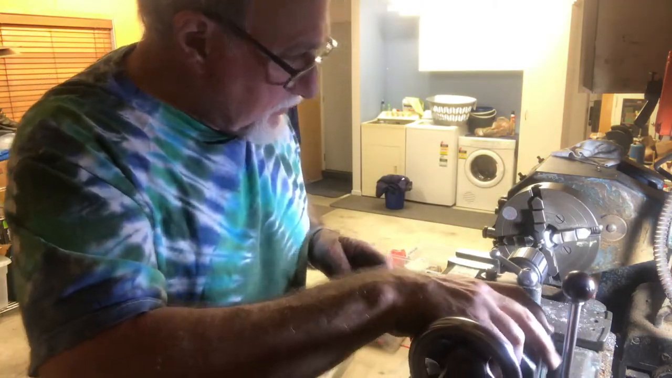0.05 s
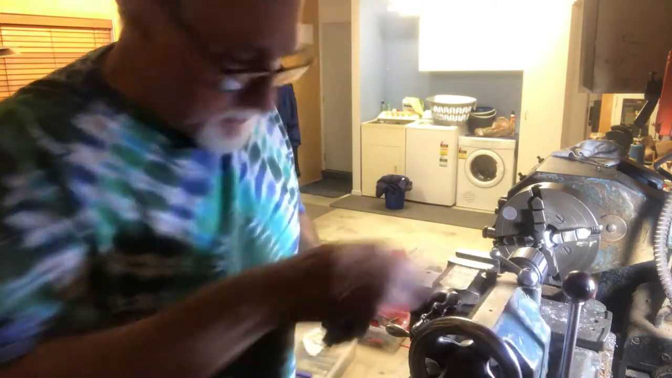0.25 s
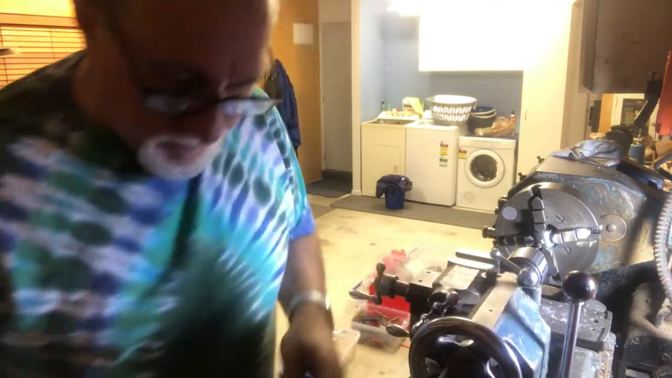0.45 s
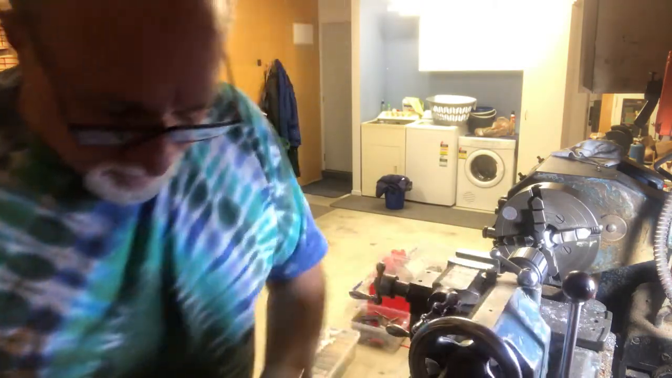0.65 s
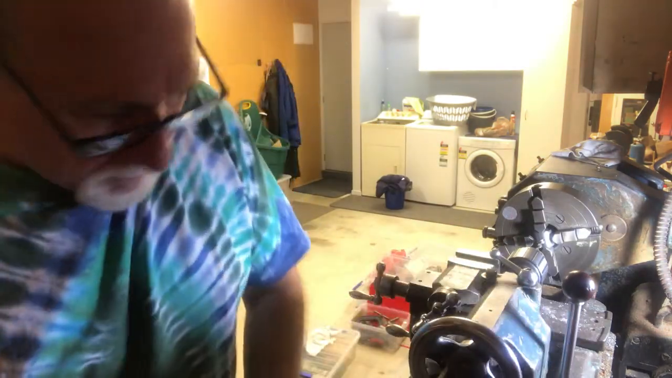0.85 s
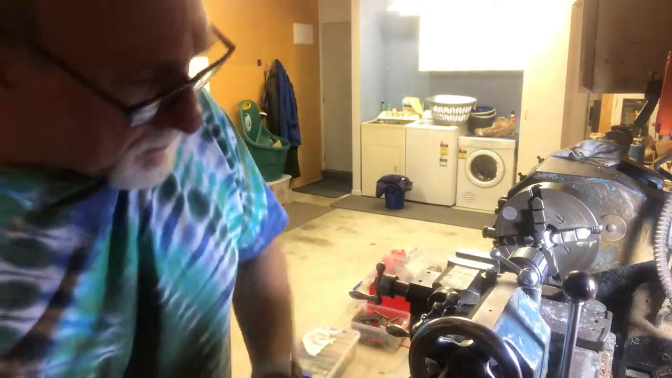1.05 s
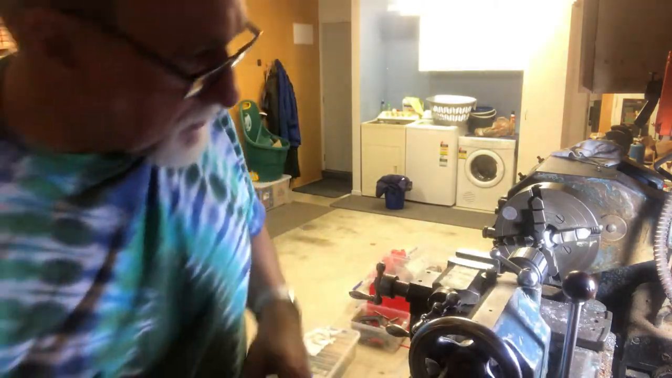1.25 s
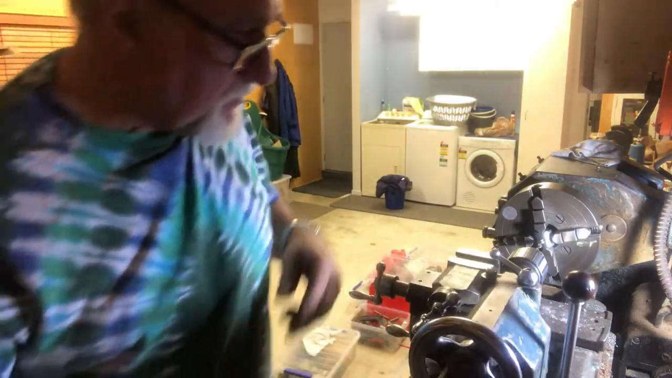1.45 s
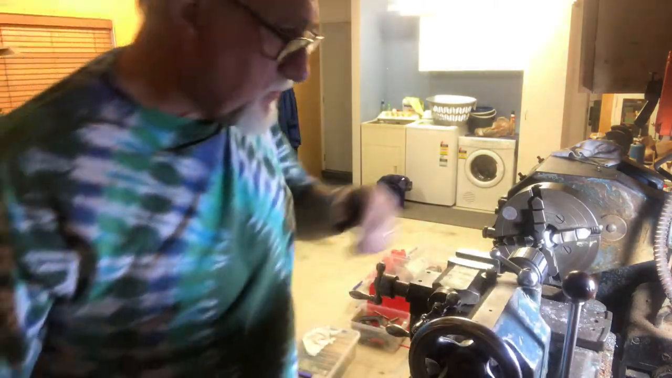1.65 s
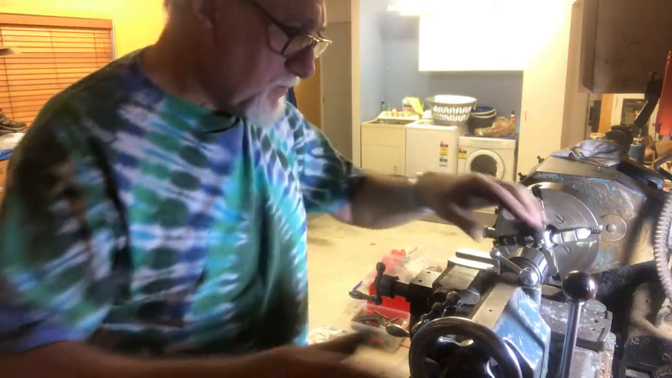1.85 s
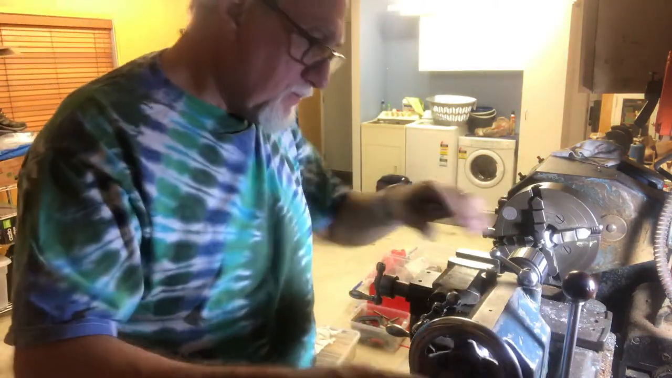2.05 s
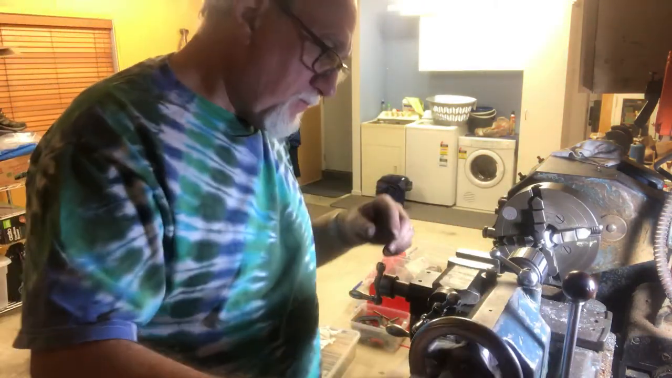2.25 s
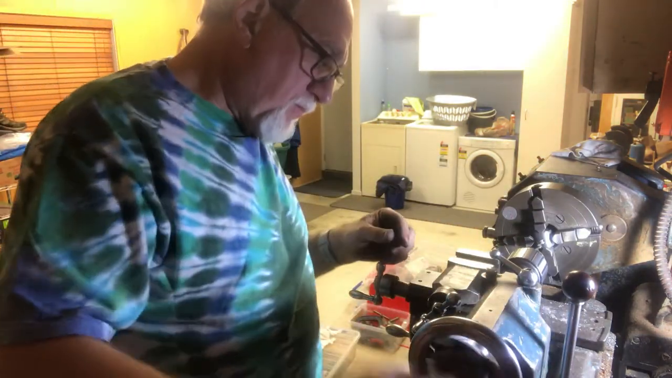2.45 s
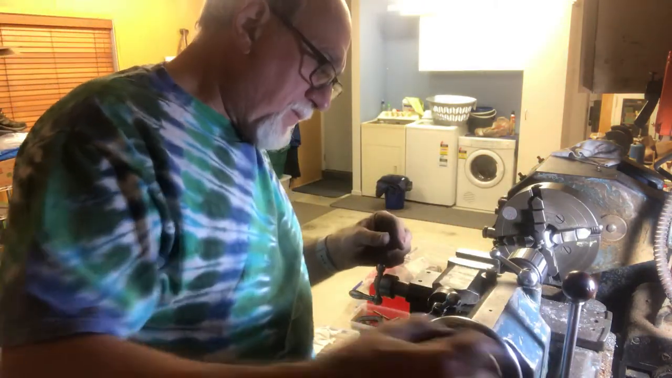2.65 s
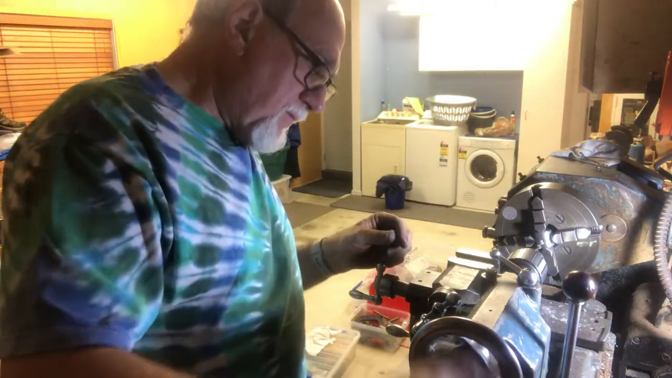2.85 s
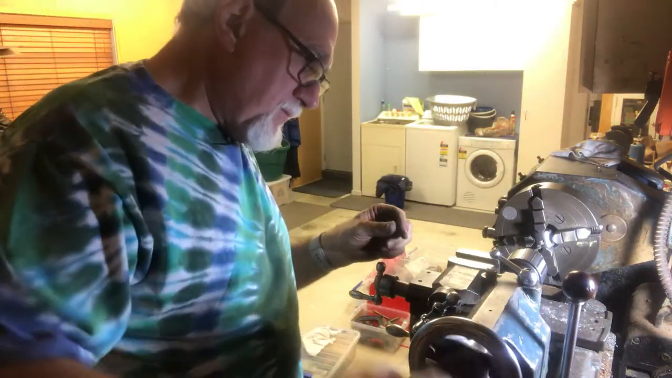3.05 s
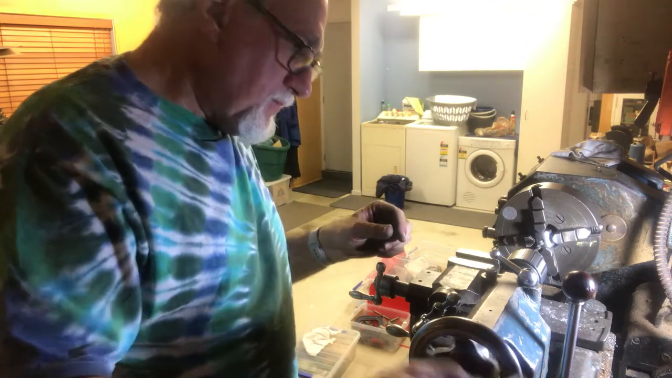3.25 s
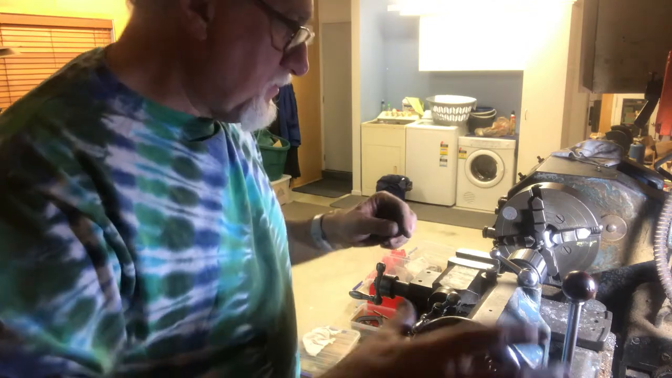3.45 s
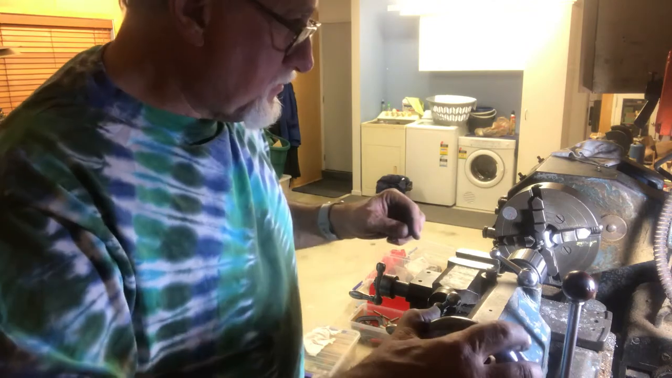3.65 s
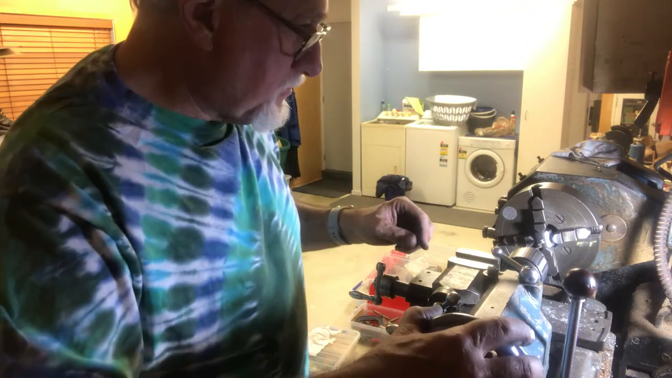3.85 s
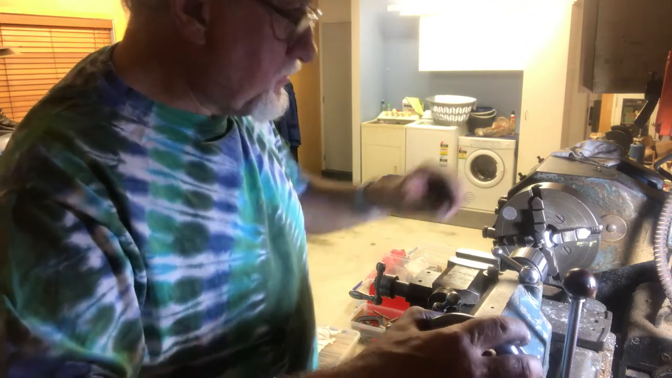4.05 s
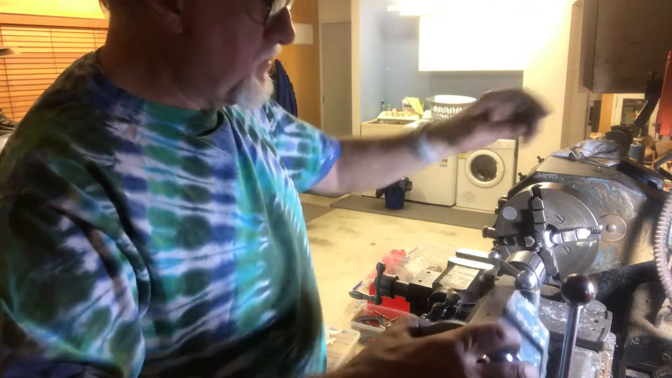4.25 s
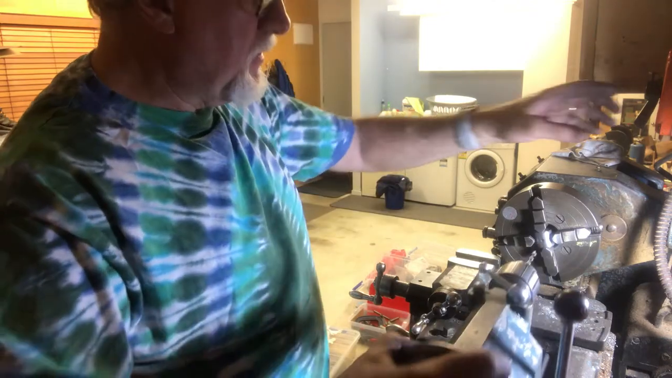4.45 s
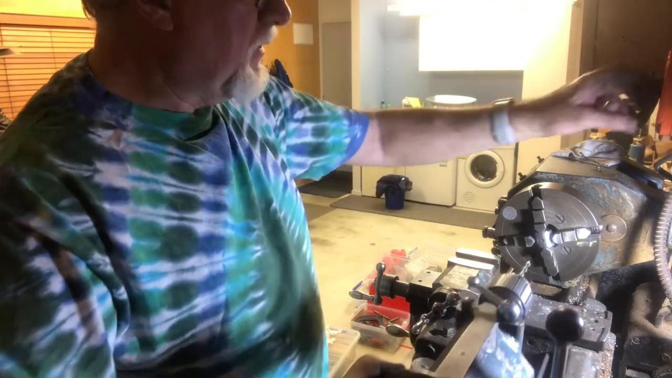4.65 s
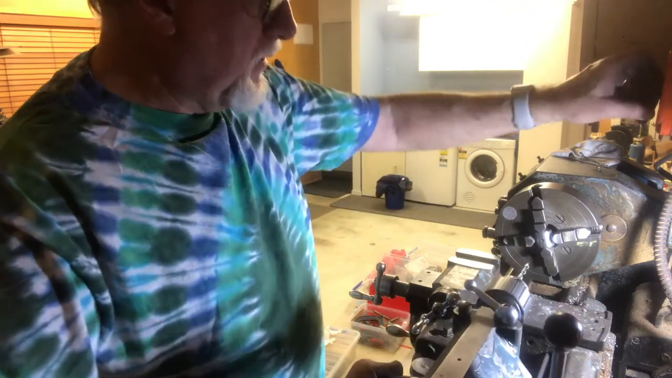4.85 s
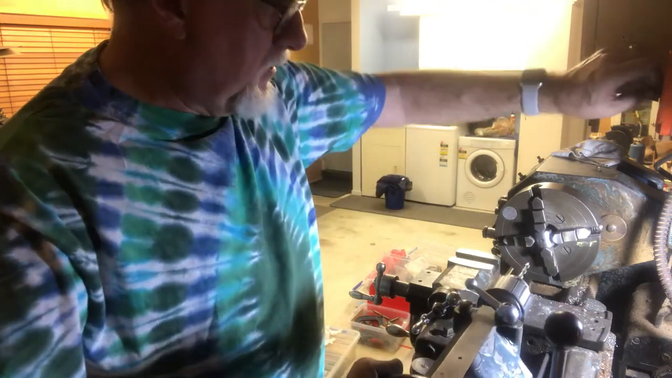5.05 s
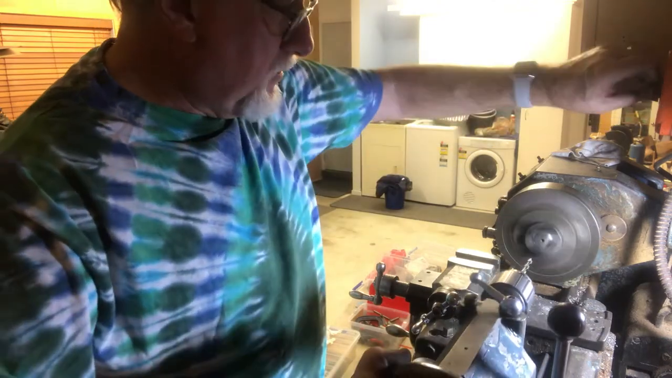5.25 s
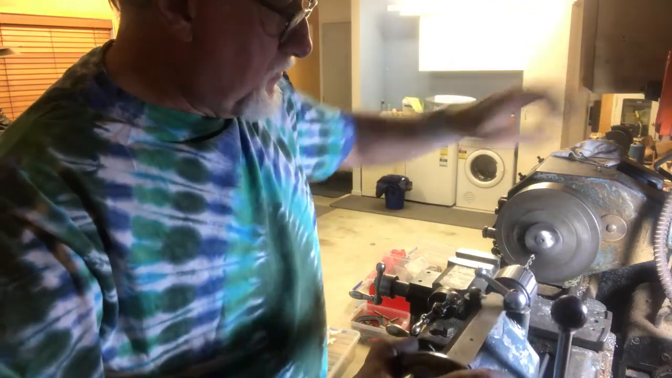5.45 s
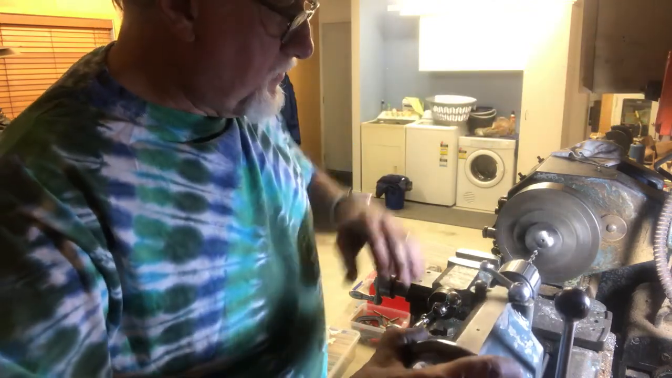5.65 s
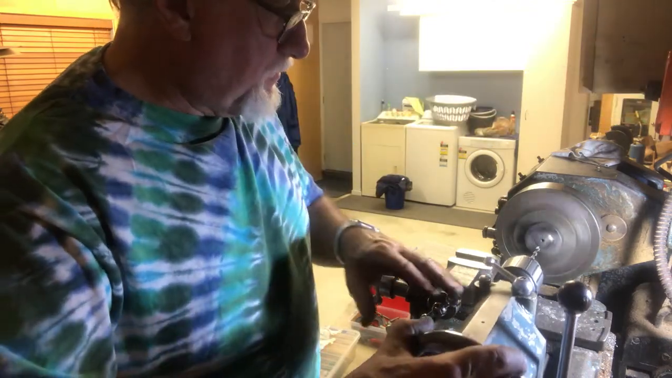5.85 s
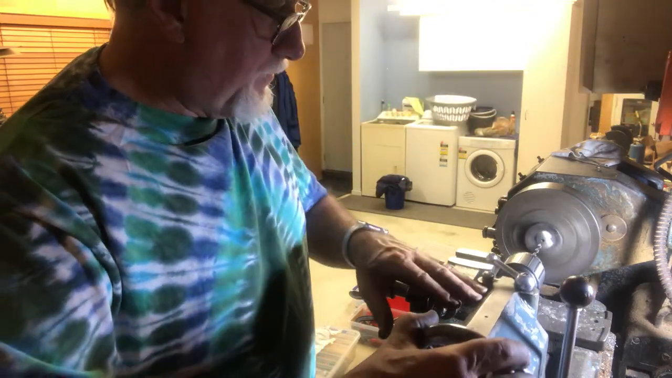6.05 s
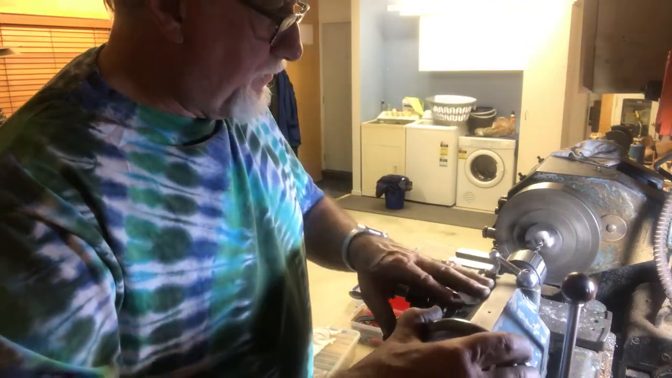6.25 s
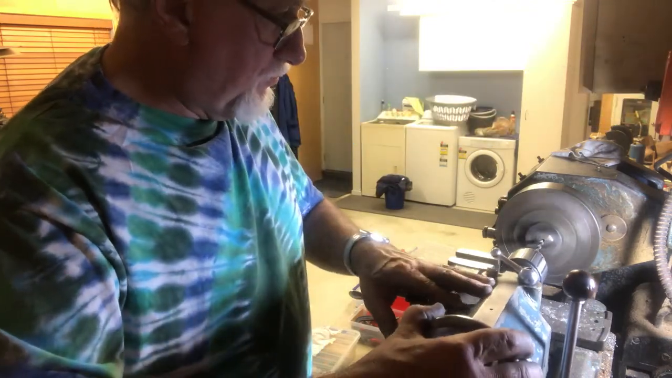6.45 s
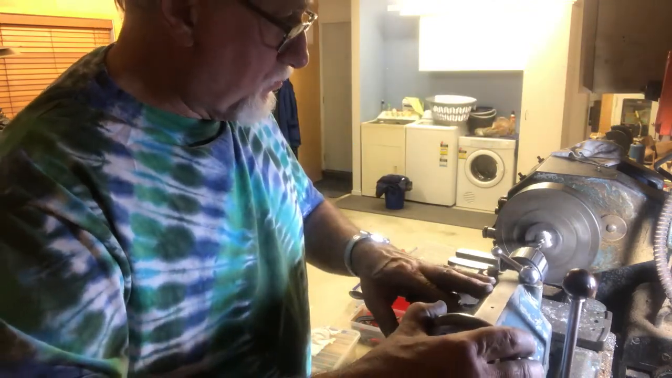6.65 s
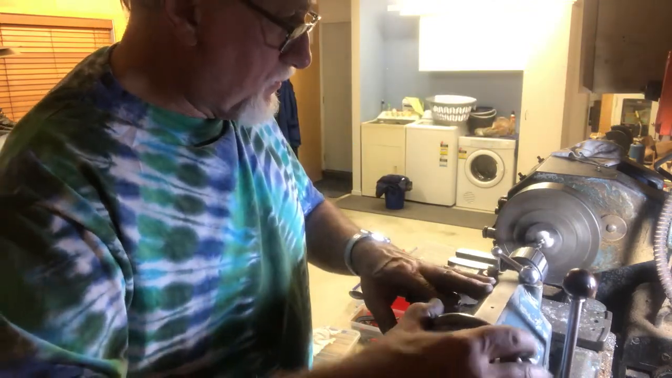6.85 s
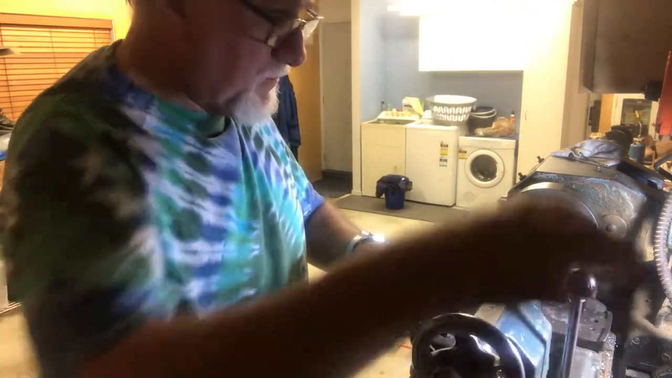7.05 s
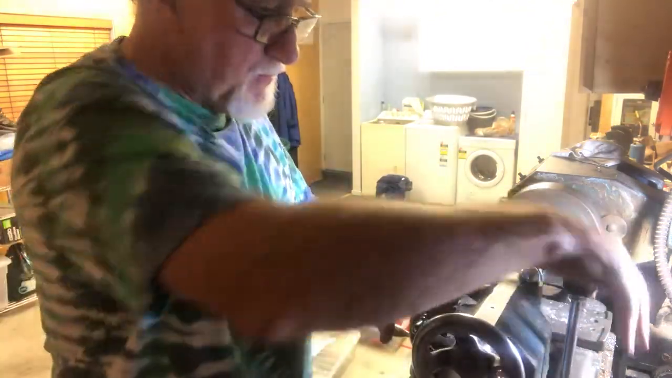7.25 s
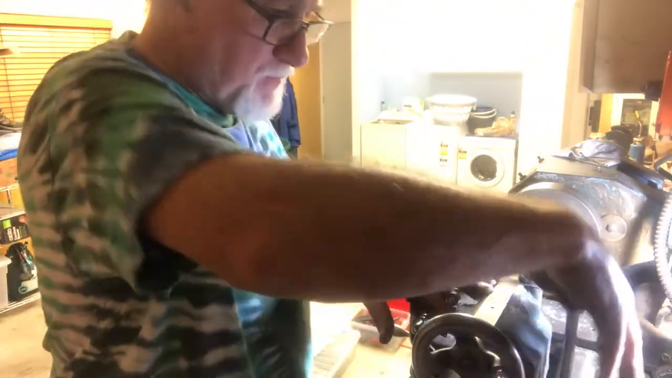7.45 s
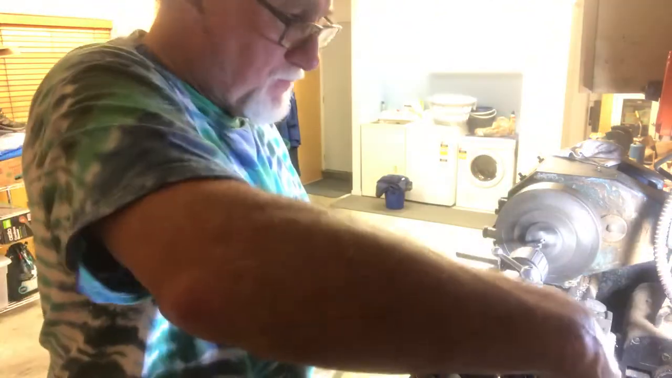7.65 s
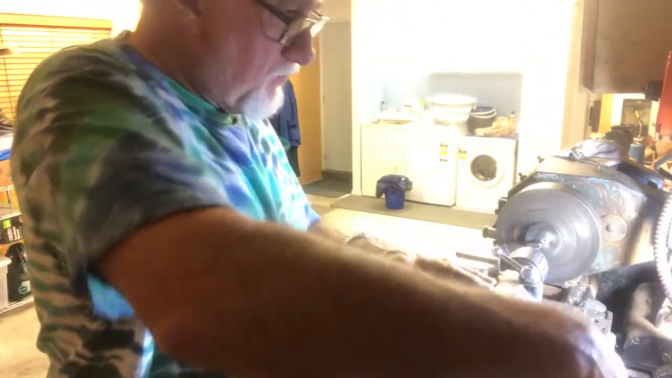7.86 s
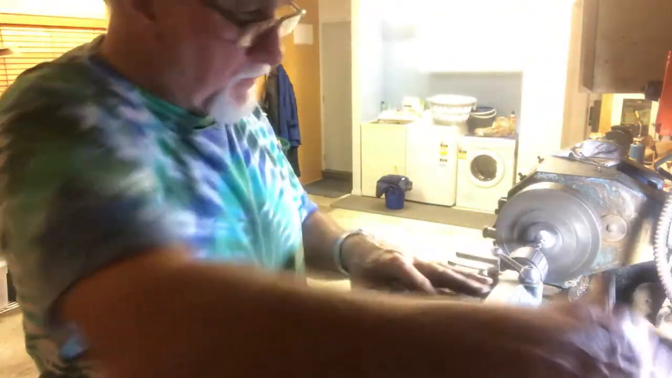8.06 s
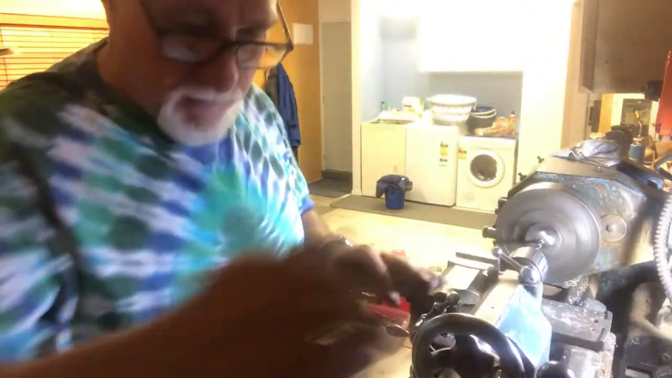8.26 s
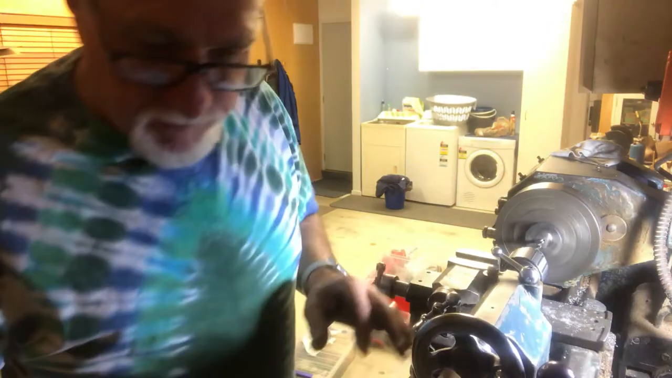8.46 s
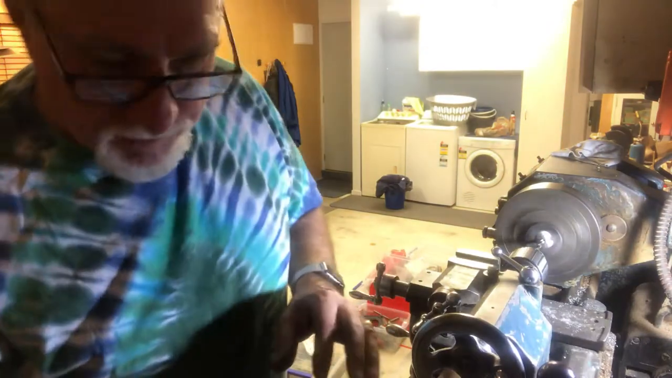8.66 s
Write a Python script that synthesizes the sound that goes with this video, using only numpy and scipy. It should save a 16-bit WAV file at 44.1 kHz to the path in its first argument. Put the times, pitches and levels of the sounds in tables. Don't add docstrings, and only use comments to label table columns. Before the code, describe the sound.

Close microphone at a bench lathe in a small workshop. Near silence with faint cloth rustle, dull knocks on the bench, a steel key clinking and bouncing in a metal pan, a soft hand brush, later a muffled touch on the lathe bed and faint greasy winding. A heavy switch clacks, the motor jolts and settles into a low hum with whirring gears, small ticks and soft drill scrapes.

```python
import sys
import numpy as np
from scipy import signal
from scipy.fft import rfft, irfft, next_fast_len
from scipy.io import wavfile
from scipy.ndimage import uniform_filter1d

SR = 44100
rng = np.random.default_rng(int(sys.argv[2]) if len(sys.argv) > 2 else 0)


def voltage_ratio(level):
    return 10 ** (np.asarray(level, float) / 20)


def store_pcm(level_fs):
    pcm = np.round(np.clip(level_fs, -1, 1) * 32767).astype(np.int16)
    wavfile.write(sys.argv[1], SR, np.atleast_2d(pcm).T)


N = 384111
T = np.arange(N) / SR

# start in seconds, level in dB, pitch in Hz, time to fall 60 dB in seconds.
THUDS = [(0.001, -35.5, 150, 0.17), (0.03, -44.5, 216, .1), (0.029, -48, 59.6, .4),
         (0.004, -27, 127, 0.059), (1.023, -26, 187, 0.076), (1.044, -35, 161.5, 0.17),
         (1.322, -37.5, 190, 0.055), (1.346, -47, 169, 0.17), (1.436, -22, 206, 0.039),
         (1.491, -25.5, 175, 0.067), (1.964, -47, 190, 0.1), (2.174, -52, 341, 0.081),
         (2.178, -50, 230, 0.12), (2.276, -51.5, 329, 0.087), (2.279, -50, 125, 0.074),
         (2.448, -61, 165, 0.13), (2.552, -49.5, 305, 0.06), (2.555, -53, 140, .08),
         (2.569, -49, 240, 0.094), (2.868, -58, 242, 0.13), (3.057, -62.5, 156.6, 0.13),
         (3.614, -53, 117.4, 0.13), (3.914, -31, 207, 0.085), (4.156, -54, 240, 0.073),
         (4.02, -52, 58.6, 0.37), (4.383, -38, 217, 0.042), (5.135, -31, 143.6, 0.28),
         (5.164, -11.5, 142, 0.042), (5.2011, -12.5, 125.3, 0.049), (5.226, -26, 105, 0.12),
         (5.244, -27.5, 144.4, 0.19), (5.285, -30.5, 136, 0.13), (5.353, -19.5, 139, 0.16)]
# start in seconds, level in dB, centre in Hz, contact length in ms.
KNOCKS = [(1.021, -24, 900, 7.2), (1.029, -25, 750, 5.5), (1.047, -34, 700, 4.8), (1.319, -44, 1500, 5),
          (1.33, -26.5, 935, 7.5), (1.369, -34.5, 1190, 7.1), (1.4357, -15, 1020, 10.5),
          (1.47, -34, 1300, 30), (1.49, -31, 1000, 20), (2.177, -61, 643, 11), (3.908, -29, 955, 5.8),
          (3.912, -25, 565, 3.6), (3.954, -39, 790, 6.1), (4.206, -42, 1480, 8.4), (4.386, -58, 610, 4.3),
          (4.995, -51.5, 860, 10), (5.137, -44, 540, 9.4), (5.151, -20, 1230, 6.1), (5.154, -20, 1210, 4),
          (5.163, -12.5, 930, 4), (5.169, -34, 620, 6.8), (5.206, -28, 565, 4.6), (6.263, -32, 1050, 19),
          (1.56, -46.5, 705, 35), (0.001, -48.5, 610, 29), (0.03, -59, 348, 34)]
# start in seconds, tick in dB, snap over tick in dB, contact length in ms.
CLICKS = [(0.979, -51, -2, 2.7), (1.022, -57, 0, 3.5), (1.32, -53, -19.5, 2.5), (1.331, -57, 10.5, 5.1),
          (1.368, -59.5, -8, 3.9), (1.436, -31, -3.5, 12), (1.444, -43, 0, 9.9), (1.45, -33, -10.5, 17),
          (1.492, -35.5, -6, 9.8), (1.968, -51, -10, 7.2), (2.177, -57, -19, 4.5), (3.906, -41, 2, 4.6),
          (3.951, -39, -18, 9.4), (4.146, -46.5, -7, 9.1), (4.208, -42, -26, 7.1), (4.994, -48.5, -6, 11),
          (5.118, -43, -5, 6.6), (5.139, -62, 14, 8), (5.154, -39, -4, 8), (5.156, -23, -9, 4.5),
          (5.19, -33, 4, 5.1), (5.195, -22, 14, 6.2), (5.211, -44, 4, 1.7), (6.173, -34, -12, 4.9)]
# start
# in seconds, centre in Hz, width in Hz, level in dB, length in ms.
PINGS = [(5.116, 3000, 600, -38, 9), (5.156, 4100, 700, -34, 6), (5.193, 3350, 400, -22, 12),
         (5.195, 1900, 300, -30, 14), (5.194, 9400, 1500, -24, 5), (5.194, 6500, 900, -28, 5),
         (5.206, 8500, 2500, -31, 6), (5.213, 3400, 400, -36, 10), (6.802, 5200, 600, -34, 12),
         (6.938, 2080, 300, -39, 8), (7.05, 8800, 800, -44, 8), (7.355, 6800, 400, -46, 8),
         (4.209, 7500, 500, -58, 8), (3.953, 7400, 300, -57, 14), (3.899, 2300, 900, -54, 5),
         (1.845, 580, 120, -60, 25), (2.005, 625, 70, -55, 30), (2.05, 625, 70, -56, 60),
         (3.91, 620, 160, -37, 14), (3.965, 680, 160, -46, 14), (2.73, 3700, 1400, -71, 50),
         (2.274, 1500, 2200, -57, 10), (2.553, 1500, 2000, -62, 14), (2.575, 560, 140, -60, 14),
         (2.205, 600, 160, -62, 14), (2.12, 630, 90, -60, 30), (6.715, 3350, 120, -40, 25),
         (7.052, 3200, 400, -36, 6), (7.11, 5600, 500, -43, 8), (7.236, 6800, 500, -43, 8),
         (6.74, 5300, 900, -45, 14), (6.941, 3400, 700, -36, 10), (4.3, 7500, 400, -72, 150),
         (4.5, 7500, 400, -70, 150), (0.983, 6200, 900, -60, 4),
         (1.33, 3000, 900, -45, 8), (5.158, 15400, 500, -50, 20), (5.139, 13500, 3500, -52, 10),
          (5.19, 12200, 3000, -38, 5), (5.205, 13000, 5000, -46, 30), (4.06, 13000, 4500, -74, 40),
          (4.085, 13000, 4500, -73, 30), (1.967, 2500, 3000, -56, 8), (5.16, 1500, 500, -30, 10),
          (3.907, 6900, 1200, -52, 6), (6.94, 8800, 900, -42, 8), (1.418, 13300, 1200, -61, 8),
          (1.46, 8000, 7000, -50, 55), (5.236, 3400, 400, -40, 8), (6.86, 5600, 900, -44, 8),
          (6.99, 5500, 1200, -43, 10), (7.275, 9000, 1500, -52, 12), (7.13, 6500, 1500, -47, 10)]
# start in seconds, end-on blow in dB, side blow in dB.
KEY_BLOWS = [
    (0.982, -60, -79),
    (1.329, -50, -95),
    (1.369, -46.5, -87.5),
    (1.4355, -24, -61.5),
    (1.449, -22.5, -65),
    (1.451, -42, -50.5),
    (1.494, -34.5, -48),
]
# firmest pressure in seconds, attack in seconds, release in seconds, level in dB, brightness in dB.
BRUSHES = [
    (.162, 0.061, 0.091, -59.5, 0.5),
    (.85, 0.13, 0.22, -67, -27),
    (2.03, 0.071, 0.16, -47.5, -10),
]
# start in seconds, level in dB.
TRAY_BLOWS = [
    (1.0222, -22),
    (1.030, -33.5),
]
# start in seconds, level in dB.
PAN_BLOWS = [
    (1.329, -48.5),
    (1.367, -48.5),
    (1.4352, -31),
    (1.445, -39.5),
    (1.49, -42),
]
# start in seconds, level in dB.
BED_BLOWS = [
    (3.9115, -32),
    (3.9245, -26.5),
    (3.951, -38),
]
# start in seconds, peak in dB, centre in Hz.
GEAR_CATCHES = [(5.449, -33, 1370), (5.561, -22.5, 1140), (5.624, -22.5, 1040), (5.744, -17, 1190),
                (6.06, -26, 945), (6.093, -31, 1190), (6.178, -19.5, 990), (6.265, -17, 1150),
                (6.309, -21, 1060), (6.6, -35, 1170), (6.728, -26, 1200), (6.938, -28, 821),
                (7.199, -29, 1070), (7.318, -23, 1180), (7.391, -30, 940), (7.523, -38, 1180),
                (7.705, -29, 1200), (7.758, -22, 1170), (7.884, -21.5, 1120), (7.934, -22, 990),
                (8.032, -37, 1180), (8.106, -19, 990), (8.291, -28, 1200), (8.353, -37, 1390),
                (8.471, -18, 961), (8.652, -35, 1400)]
# start in seconds, scrape in dB, squeak in dB, tailstock ring in dB.
RUBS = [(6.7204, -44, -59, -54), (6.8074, -44, -36.5, -54), (6.8144, -53, -52, -41), (6.826, -62, -60, -33),
        (6.8604, -39, -46, -55), (6.875, -43, -55, -52), (6.8838, -43, -60, -36), (6.9117, -39, -49, -53),
        (6.938, -31.5, -29, -28), (6.985, -39, -42, -52), (6.9986, -35.5, -52, -54),
        (7.0344, -34.5, -50, -43), (7.012, -46, -52, -38), (7.0505, -43, -42, -51), (7.075, -55, -55, -55),
        (7.1115, -39, -43, -37), (7.1563, -41, -59, -44), (7.128, -39, -55, -53), (7.232, -49, -55, -35.5),
        (7.2814, -50, -61, -32), (7.3552, -45, -63, -35), (7.3994, -51, -60, -37), (7.428, -60, -63, -47),
        (7.4794, -48, -60, -44), (7.515, -62, -63, -44), (7.545, -64, -63, -47), (7.7194, -54, -64, -37),
        (7.745, -64, -64, -48), (7.9758, -50, -60, -43)]
# time in seconds, rustle in dB.
CLOTH = [(0, -66), (.05, -70.5), (.25, -76.5), (.46, -70), (.85, -66), (1.26, -69.5), (1.7, -74),
         (1.91, -68), (2.3, -72), (2.6, -71.5), (3.0, -74.5), (3.72, -74), (3.9, -63.5), (4.1, -70.5),
         (4.5, -63), (4.8, -66.5), (5.0, -77.5), (5.2, -49)]
# time in seconds, level in dB.
WINDING = [
    (4.2, -65),
    (4.23, -62),
    (4.384, -58.5),
    (4.418, -56.5),
    (4.726, -58),
    (4.99, -62),
    (5.1, -70),
]

# pitch in Hz, level in dB, time to fall 60 dB in seconds.
BENCH_MODES = [(662, 13.5, 0.18), (709.5, -7, 0.11), (746, -9, 0.18), (935, -10, 0.33), (1020, -20, .28),
               (1230, -1, 0.34), (1410, -0.5, 0.46), (1660, -9, .3), (1650, -6.5, 0.35), (1940, -9, .4),
               (2064, -14, 0.34)]
TRAY_MODES = [(618, -1.5, 0.12), (720, -1, 0.24), (790, 5, 0.094), (938, -0.5, 0.16), (1050, -13.5, 0.21),
              (1211, -18, 0.21), (1389, -13, .25), (1610, -24, .28), (1927, -32.5, .25)]
PAN_MODES = [(700, -6, 0.38), (828, -16.5, 0.15), (1028, -20, 0.4), (1243, -1.5, 0.2), (1292, 4, 0.29),
             (1551, -4, 0.53), (1650, -7.5, 0.59), (1790, -19.5, 0.52), (1925, -24, 0.52), (2100, -7, 0.53),
             (2622, -18, 0.53), (2870, -19, 0.47), (3210, -10.5, 0.24), (3424, -22, 0.68)]
BED_MODES = [(113, 0, .2), (145, -7, .15), (231, -8, .13), (190, -10, .09), (340, -11, .07),
             (614, -15, .12), (958, -19, .12)]
KEY_SIDE_MODES = [(6433, 6, .45), (6713, -17, .4), (12590, -8, .45), (12760, 6, .42)]
KEY_END_MODES = [(7542, -11, .45), (7607, -2, .34), (7680, -10, .25), (14260, -17, .2), (14480, -12, .25),
                 (14540, -12, .32), (14680, -14, .15), (15210, -14, .1)]
# centre in Hz, width in Hz, level in dB.
ROOM_TONE = [(240, 40, 0), (620, 50, -9), (1400, 120, -14), (3620, 240, -14)]
SLIDE = [(190, 100, -3), (614, 39, -0.5), (900, 96, -10.5), (1373, 100, -3.5), (3720, 370, -12),
         (4600, 800, -16.5)]
RUMBLE = [(44.6, 24, -10), (68, 17, -11.5), (115.6, 27, 0), (150, 72, -6.5), (178, 10, 1.5),
          (220.4, 6.4, 2.5), (240, 42, -3.5), (288.5, 14, -10.5)]
CASING = [(657, 46, -2.5), (820, 40, -14.5), (975, 62, 4), (1100, 89, 1), (1190, 42, 4.5), (1470, 140, 1),
          (1712, 16, 4.5), (2101, 37, -2.5), (2583, 110, -2), (3308, 55, 4), (3590, 52, 1), (3673, 23, 4.5),
          (3850, 42, -1)]
# frequency in Hz, level in dB per Hz.
HANDLING_COLOUR = [(35, -34.5), (60, -7), (121, -3.5), (250, -6), (287, -12), (749, -15), (924, -15.5),
                   (1170, -17), (2650, -22.5), (2900, -21), (10300, -36.5), (13600, -34), (16000, -41.5)]
WHIRR_COLOUR = [(280, -8.5), (390, -5.5), (560, -8.5), (760, -11), (1170, -3), (1750, -8), (2930, -8),
                (3600, -6), (4800, -14.5), (6000, -15), (8000, -17), (11000, -19.5), (16000, -23.5)]
# multiple of the hum pitch, level in dB.
HUM_OVERTONES = [(1, -1.5), (2, -17), (4, -27.5)]
# frequency in Hz, gain in dB.
MIC = [(20, -34), (45, 2.5), (4500, -3), (5000, -4.5), (5500, -0.5), (9700, 0), (10400, -6), (11100, 0),
       (15300, 0.5), (15800, -5), (16100, -35.5)]

ROOM_T60_S, ROOM_DULLING, ROOM_DB = 0.5, 0.23, -20
DEEP_DB = -68
STILL_LOW_DB, STILL_MIDDLE_DB, CLOTH_MIDDLE_DB, CLOTH_MIDDLE_SLOPE = -71, -101, -74, 1.44
WINDING_LOW_DB, WINDING_MIDDLE_DB = -3, -10
BRUSH_FADE_DB = 22
BENCH_RING_DB, SHUDDER_DB, SHUDDER_T60_S = -60, -14, 0.096
KEY_RISE_S, KEY_FLUTTER_DB = .0015, 2.5
SMEAR_SHARE, SOLID_SHARE = .08, .005
LURCH_S, LURCH_HZ, LURCH_DB, LURCH_T60_S, LURCH_RISE_S = 5.19, 44.1, -32, 1.0, .03
CHIRP_S, CHIRP_HZ, CHIRP_FALL_HZ, CHIRP_LENGTH_S, CHIRP_DB = 3.35, 9640, 2400, .08, -84
SWITCH_S, FULL_SPEED_S, HUM_HZ = 5.14, 5.36, 99.87
HUM_DB, RUMBLE_DB, WHIRR_DB, HISS_DB = -29, -37.5, -36.5, -53
SLOW_HUM_DB, SLOW_WHIRR_DB, SLOW_HISS_DB, HUM_RISE_S = 1, -11.5, -26, 0.047
JOLT_S, JOLT_WIDTH_S, JOLT_DB, JOLT_SETTLE_S = 5.25, .06, 5, .08
CUTOUT_S, CUTOUT_WIDTH_S, CUTOUT_DB = 5.3, 0.033, -11
LOAD_S, LOAD_WIDTH_S, LOAD_DB = 7.04, 0.17, 1.4
CATCH_DB, CATCH_MS = -8, 7
RUB_MS = 11.1
SPINDLE_HZ, SEATED_S, CONTACT_SHARE, SEATED_DB = 8.12, 7.222, .5, -57


def unit(x):
    return x / np.sqrt(np.mean(x ** 2))


def band(x, lo_hz, hi_hz):
    sos = signal.butter(2, [lo_hz, min(hi_hz, .45 * SR)], "band", fs=SR, output="sos")
    return signal.sosfilt(sos, x)


def shaped(gain):
    size = next_fast_len(N)
    hz = np.arange(1, size // 2 + 2) * SR / size
    re, im = rng.standard_normal((2, len(hz)))
    return unit(irfft((re + 1j * im) * gain(hz), size)[:N])


def colour(points):
    hz, db = np.transpose(points)
    return lambda f: voltage_ratio(np.interp(np.log(f), np.log(hz), db))


def peaks(rows):
    def gain(f):
        return np.sqrt(sum(voltage_ratio(2 * db) / (1 + (2 * (f - hz) / w) ** 2) ** 2 for hz, w, db in rows))
    return gain


def walk(rate):
    k = int(SR / rate)
    steps = np.repeat(rng.standard_normal(N // k + 1), k)
    return unit(uniform_filter1d(uniform_filter1d(steps, k), k)[:N])


def curve(table):
    return np.interp(T, *np.transpose(table), left=-120, right=-120)


def decay(t, t60):
    return np.exp(-np.log(1000) * t / t60)


def swell_and_fall(t_ms, rise_ms, length_ms):
    return (1 - np.exp(-t_ms / rise_ms)) * np.exp(-t_ms / max(length_ms, .5))


def bursts(s, db, ms, rise_ms):
    out = np.zeros(N)
    for start_s, level_db, length_ms in zip(s, db, ms):
        i = int(start_s * SR)
        t_ms = T[:min(N - i, SR // 4)] * 1000
        out[i:i + len(t_ms)] += voltage_ratio(level_db) * swell_and_fall(t_ms, rise_ms, length_ms)
    return out


def rattle(noise, s, lo_hz, hi_hz, db, ms, rise_ms):
    out, i = np.zeros(N), int(s * SR)
    t_ms = T[:min(N - i, SR // 5)] * 1000
    grain = unit(band(noise[i:i + len(t_ms)], lo_hz, hi_hz))
    out[i:i + len(t_ms)] = voltage_ratio(db) * swell_and_fall(t_ms, rise_ms, ms) * grain
    return out


def impulses(s, db):
    return np.bincount((s * SR).astype(int), voltage_ratio(db), N)


def tone(s, hz, db, t60, rise_s):
    out, i = np.zeros(N), int(s * SR)
    t = T[:min(N - i, SR // 2)]
    wave = np.sin(2 * np.pi * hz * t) * (1 - np.exp(-t / rise_s))
    out[i:i + len(t)] = voltage_ratio(db) * wave * decay(t, max(t60, .02))
    return out


def ring(x, modes, rise_s):
    t = T[:SR // 2]
    body = sum(voltage_ratio(db) * np.sin(2 * np.pi * hz * t) * decay(t, max(t60, .01)) for hz, db, t60 in modes)
    return signal.oaconvolve(x, body * (1 - np.exp(-t / rise_s)))[:N]


def restless(rows):
    out, depth_db = 0, 3
    for k in range(3):
        part = rows[k::3]
        strength = np.sqrt(sum(voltage_ratio(2 * db) * w for hz, w, db in part))
        out = out + strength * voltage_ratio(depth_db * walk(22)) * shaped(peaks(part))
    return unit(out)


def room_tone():
    quiet = voltage_ratio(-73) * (T < 5.2) * shaped(peaks(ROOM_TONE))
    deep = unit(band(rng.standard_normal(N), 27, 85))
    return quiet + voltage_ratio(DEEP_DB + 1.2 * walk(4)) * deep


def handling():
    cloth_db, winding = curve(CLOTH), voltage_ratio(curve(WINDING))
    low = voltage_ratio(STILL_LOW_DB) + voltage_ratio(WINDING_LOW_DB) * winding
    middle = voltage_ratio(STILL_MIDDLE_DB) + voltage_ratio(CLOTH_MIDDLE_DB + CLOTH_MIDDLE_SLOPE * (cloth_db + 73))
    middle += voltage_ratio(WINDING_MIDDLE_DB) * winding
    base = colour(HANDLING_COLOUR)
    below = lambda f, hz: 1 / np.sqrt(1 + (f / hz) ** 3)
    above = lambda f, hz: below(hz, f)
    out = low * shaped(lambda f: base(f) * above(f, 95) ** 2 * below(f, 800)) * voltage_ratio(1.2 * walk(20))
    out += middle * shaped(lambda f: base(f) * above(f, 800) * below(f, 5000)) * voltage_ratio(.8 * walk(40))
    return out + voltage_ratio(cloth_db) * shaped(lambda f: base(f) * above(f, 5000)) * voltage_ratio(.8 * walk(30))


def knocks():
    noise = rng.standard_normal(N)
    knock = sum(rattle(noise, s, hz / 1.5, hz * 1.6, db, ms, 0.14) for s, db, hz, ms in KNOCKS)
    t = T[:SR // 2]
    fade = decay(t, SHUDDER_T60_S)
    loose = band(noise[:len(t)], 387, 1600) * fade
    loose += 1.02 * band(noise[:len(t)], 1300, 5000) * fade ** 2.1
    shudder = signal.oaconvolve(knock, loose / np.sqrt(np.sum(loose ** 2)))[:N]
    bench = ring(knock, BENCH_MODES, 1 / SR)
    return 0.97 * knock + voltage_ratio(BENCH_RING_DB) * bench + voltage_ratio(SHUDDER_DB) * shudder


def thuds():
    noise = rng.standard_normal(N)
    out = 0
    for s, db, hz, t60 in THUDS:
        out = out + tone(s, hz, db + 4.5, t60, 0.0027)
        out = out + rattle(noise, s, .9 * hz, 1.9 * hz, db - 4.0, 110 * t60, 7.1)
    return out


def brush():
    body = shaped(colour([(300, -4.0), (1500, -1.5), (4000, 2.0), (6500, -6.5), (9000, -31)]))
    top = shaped(colour([(3500, -22.0), (6000, 0), (10000, -2.5), (16000, -5)]))
    out = 0
    for s, attack_s, release_s, db, bright_db in BRUSHES:
        press_db = curve([(s - attack_s, db - BRUSH_FADE_DB / 2), (s, db), (s + release_s, db - BRUSH_FADE_DB)])
        out = out + voltage_ratio(press_db) * (body + voltage_ratio(bright_db) * top)
    return out * voltage_ratio(0.78 * walk(150))


def clicks():
    s, tick_db, snap_db, ms = np.transpose(CLICKS)
    tick_noise = shaped(colour([(1200, -16.5), (2200, -1.5), (4500, 1.0), (7000, -25)]))
    snap_noise = shaped(colour([(4000, -15.0), (6000, -2.5), (9500, -2.0), (13500, -9.5), (16000, -6.0)]))
    tick = bursts(s, tick_db, ms, 0.84) * tick_noise
    snap = bursts(s, tick_db + snap_db, ms, 0.23) * snap_noise
    return 0.8 * tick + 0.51 * snap


def key():
    s, end_db, side_db = np.transpose(KEY_BLOWS)

    def sung(blows, modes):
        return sum(voltage_ratio(KEY_FLUTTER_DB * walk(70)) * ring(blows, [mode], KEY_RISE_S) for mode in modes)
    return 0.54 * sung(impulses(s, end_db), KEY_END_MODES) + 1.1 * sung(impulses(s, side_db), KEY_SIDE_MODES)


def pings():
    noise = rng.standard_normal(N)
    parts = PINGS
    return 1.1 * sum(rattle(noise, s, hz - w / 2, hz + w / 2, db, ms, 0.17) for s, hz, w, db, ms in parts)


def struck():
    out = tone(LURCH_S, LURCH_HZ, LURCH_DB, LURCH_T60_S, LURCH_RISE_S)
    t = T[:SR // 2]
    for blows, modes, share in ((TRAY_BLOWS, TRAY_MODES, SMEAR_SHARE), (PAN_BLOWS, PAN_MODES, SMEAR_SHARE),
                                (BED_BLOWS, BED_MODES, SOLID_SHARE)):
        hz, db, t60 = np.transpose(modes)[:, :, None]
        steps = rng.standard_normal((len(hz), len(t)))
        wander = np.cumsum(steps, axis=1) * np.sqrt(2 * np.pi * share * hz / SR)
        body = np.sum(voltage_ratio(db) * np.sin(2 * np.pi * hz * t + wander) * decay(t, t60), axis=0)
        body = band(body, hz.min() / 1.5, hz.max() * 1.3)
        out = out + signal.oaconvolve(impulses(*np.transpose(blows)), body)[:N]
    return out


def chirp():
    u = np.clip((T - CHIRP_S) / CHIRP_LENGTH_S, -.5, 1)
    hz = CHIRP_HZ - CHIRP_FALL_HZ * u ** 2
    return voltage_ratio(CHIRP_DB) * np.sin(2 * np.pi * np.cumsum(hz) / SR) * (u + .5) * (1 - u) * 2


def slide():
    return voltage_ratio(curve(WINDING)) * restless(SLIDE)


def running():
    bump = lambda s, width_s: np.exp(-((T - s) / width_s) ** 2)
    on = T > SWITCH_S
    load_db = LOAD_DB * bump(LOAD_S, LOAD_WIDTH_S)
    slip = np.clip((FULL_SPEED_S - T) / (FULL_SPEED_S - SWITCH_S), 0, 1)
    hum_db = SLOW_HUM_DB * np.clip(1 - (T - SWITCH_S) / HUM_RISE_S, 0, 1)
    hum_db += CUTOUT_DB * bump(CUTOUT_S, CUTOUT_WIDTH_S)
    late = T - JOLT_S
    jolt_rise_db = JOLT_DB + 17 * late / JOLT_WIDTH_S
    jolt_settle_db = JOLT_DB * np.exp(-np.abs(late) / JOLT_SETTLE_S)
    jolt_db = np.where(late < 0, jolt_rise_db, jolt_settle_db)
    levels_db = (HUM_DB + hum_db, RUMBLE_DB + jolt_db + load_db,
                 WHIRR_DB + SLOW_WHIRR_DB * slip + load_db, HISS_DB + SLOW_HISS_DB * slip)
    return [on * voltage_ratio(db) for db in levels_db]


def motor():
    hum, rumble, whirr, hiss = running()
    phase = 2 * np.pi * HUM_HZ * T + 0.11 * walk(2.6)
    out = hum * 2 ** .5 * sum(voltage_ratio(db) * np.sin(k * phase + 0.74 * (k - 1)) for k, db in HUM_OVERTONES)
    out += rumble * voltage_ratio(1.3 * walk(18)) * shaped(peaks(RUMBLE))
    teeth = voltage_ratio(1.2 * walk(90) + .6 * walk(16))
    air = shaped(colour(WHIRR_COLOUR))
    out += whirr * teeth * (0.75 * unit(band(air, 245, 4970)) + 0.53 * restless(CASING))
    return out + hiss * voltage_ratio(1.35 * walk(60)) * unit(band(air, 2540, 14300))


def gear_catches():
    noise = rng.standard_normal(N)
    return sum(rattle(noise, s, hz / 1.1, hz * 1.18, db + CATCH_DB, CATCH_MS, .8) for s, db, hz in GEAR_CATCHES)


def drill_rubs():
    s, scrape_db, squeak_db, _ = np.transpose(RUBS)
    ms = np.full(len(s), RUB_MS)
    scrape = shaped(colour([(1500, 18.5), (3500, 13.5), (5500, 8.5), (9000, 1.5), (12000, 2.0), (14500, 4),
                            (16000, -3)]))
    squeak = shaped(peaks([(14450, 700, 0), (9000, 1500, 0)]))
    touches = 2.14 * bursts(s, scrape_db, ms, 2.3) * scrape + 0.35 * bursts(s, squeak_db, ms, 0.78) * squeak
    turn = (T - SEATED_S) * SPINDLE_HZ % 1 / CONTACT_SHARE
    contact = voltage_ratio(SEATED_DB + 1.5 * walk(8)) * (T > SEATED_S) * np.sin(np.pi * np.clip(turn, 0, 1)) ** .5
    seated = contact * (.6 * squeak + 1.9 * scrape)
    grit = voltage_ratio(1.6 * walk(300))
    return grit * (touches + seated)


def tailstock():
    s, _, _, ring_db = np.transpose(RUBS)
    note = np.sin(2 * np.pi * 619 * T + .8 * walk(30))
    sing = bursts(s, ring_db + 3, np.full(len(s), 24), 6) * note
    return 0.83 * voltage_ratio(1.3 * walk(60)) * sing


def room(x):
    t = T[:SR // 2]
    tail = 0
    for k in range(-3, 4):
        octave = band(rng.standard_normal(len(t)), 700 * 2. ** k, 1400 * 2. ** k)
        tail = tail + octave * decay(t, ROOM_T60_S / 2 ** (ROOM_DULLING * max(k, 0)))
    tail = tail * np.clip(t / 0.003, 0, 1)
    return signal.oaconvolve(x, 2 * tail / np.sqrt(np.sum(tail ** 2)))[:N]


def scene():
    blows = knocks() + thuds() + clicks() + key() + pings() + struck()
    hands = room_tone() + handling() + brush() + chirp() + slide()
    machine = motor() + gear_catches() + drill_rubs() + tailstock()
    return (blows + voltage_ratio(ROOM_DB) * room(blows) + hands + machine)[None]


def low_pass(x):
    return signal.sosfilt(signal.butter(12, 15850, fs=SR, output="sos"), x)


def record(dry):
    size = next_fast_len(N + SR)
    hz = np.arange(1, size // 2 + 2) * SR / size
    heard = irfft(rfft(dry, size) * colour(MIC)(hz), size)[:, :N]
    return low_pass(heard)


dry = scene()
out = record(dry)
store_pcm(out)
```